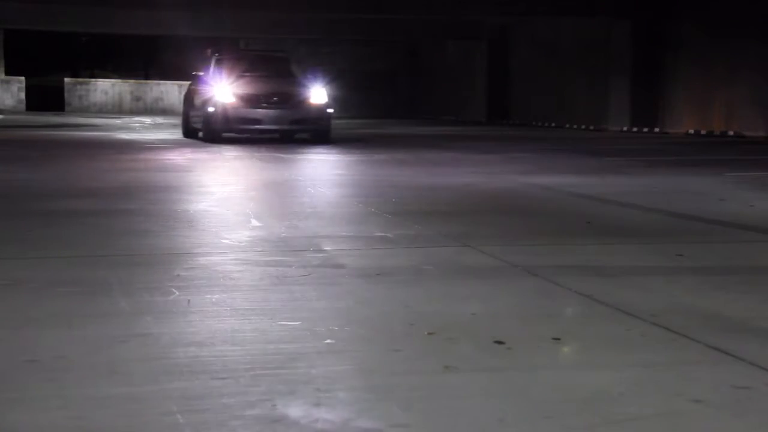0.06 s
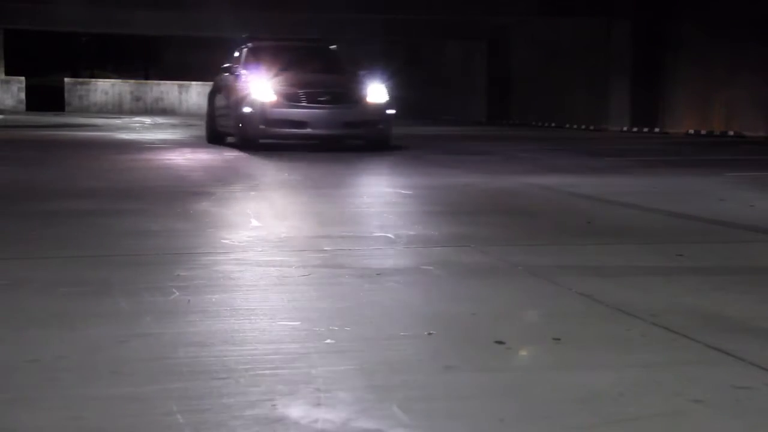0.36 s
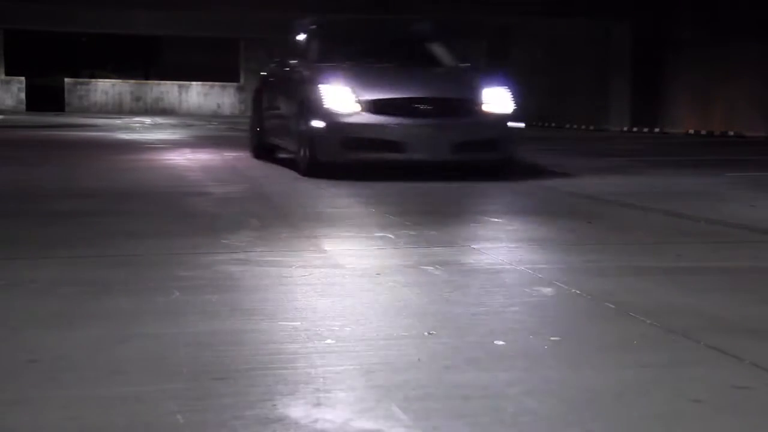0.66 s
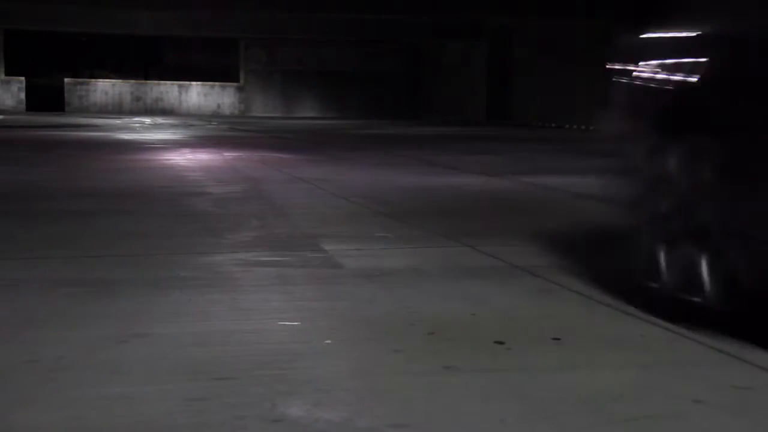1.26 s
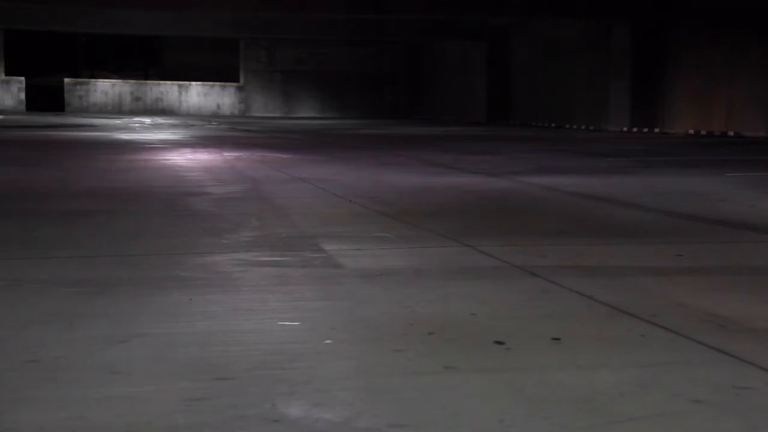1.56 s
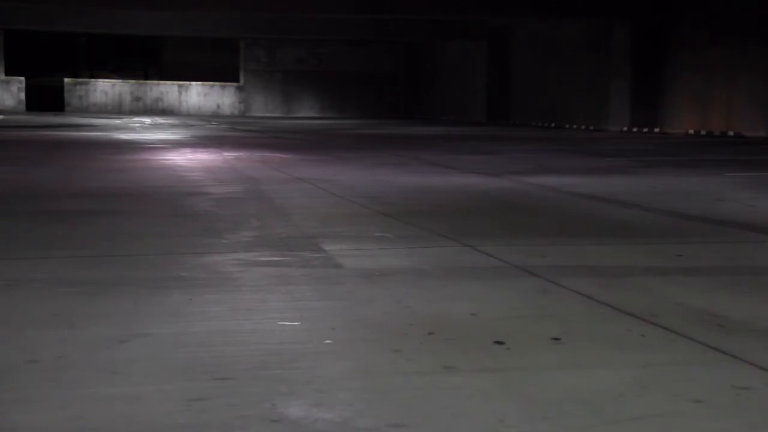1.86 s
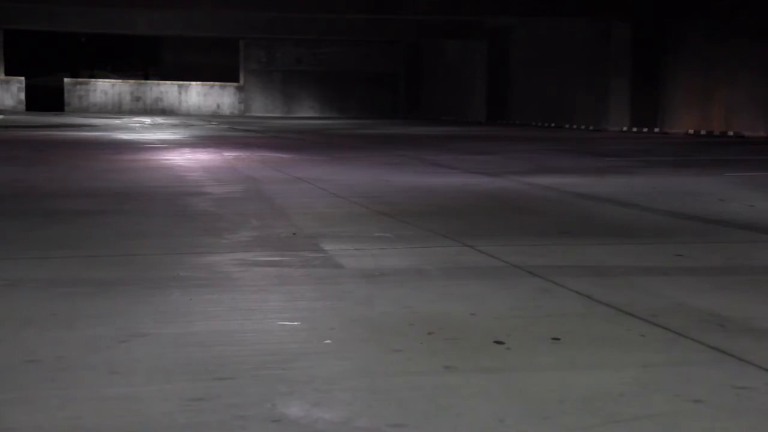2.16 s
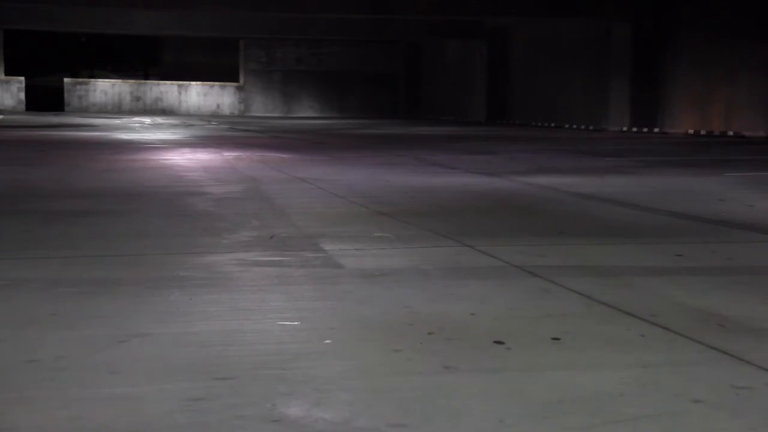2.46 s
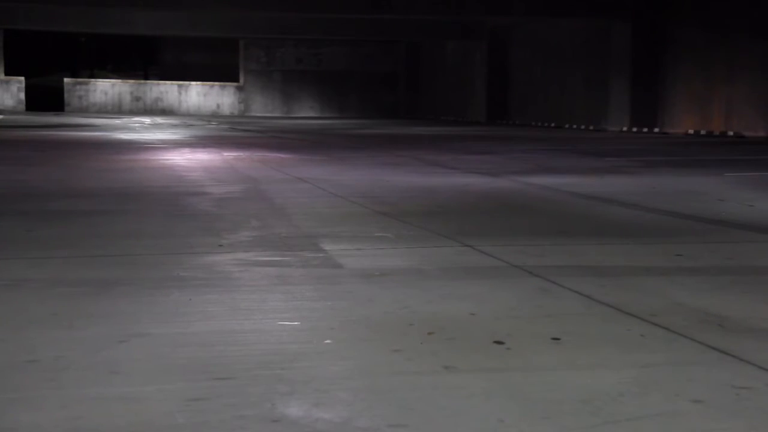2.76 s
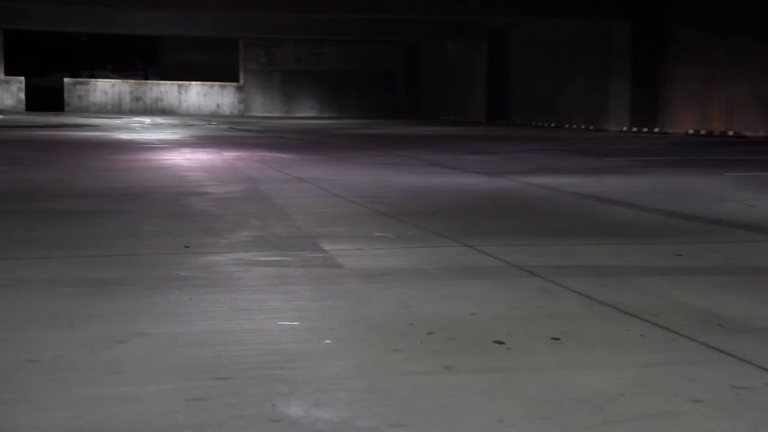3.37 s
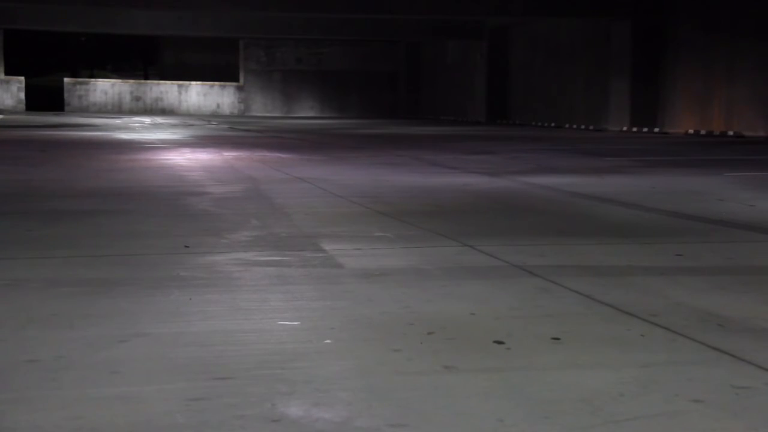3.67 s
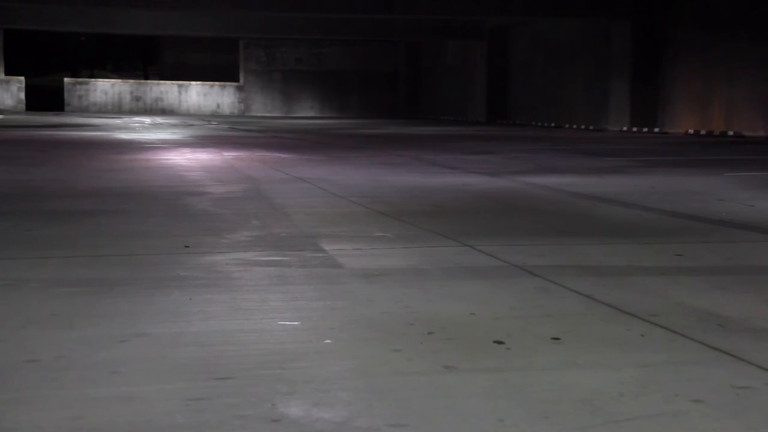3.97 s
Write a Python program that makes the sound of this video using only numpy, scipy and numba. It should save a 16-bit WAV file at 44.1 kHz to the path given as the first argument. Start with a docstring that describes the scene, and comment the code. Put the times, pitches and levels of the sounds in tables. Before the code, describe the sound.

In a reverberant parking garage, a car's engine note climbs as it approaches. Tyres and exhaust rush past close to the microphone, then the pitch drops and the engine burbles and booms while the car rolls away.

```python
"""A six-cylinder exhaust note climbs as a car accelerates through a ringing concrete garage.
The car passes close to a camera and eases off: the note drops and gives way to burble and low boom.
Uneven firings ring the exhaust and body and gate a gas rasp; tyres and the tailpipe jet hiss past.
Standing waves throb and the hall hisses throughout; the camera's gain control evens the level."""
import sys
import numpy as np
from scipy import signal
from scipy.fft import rfft, irfft
from scipy.io import wavfile
from scipy.ndimage import uniform_filter1d, map_coordinates
from numba import njit

SR = 44100
rng = np.random.default_rng(int(sys.argv[2]) if len(sys.argv) > 2 else 0)


def materialize(psi):
    """Save the field psi as 16-bit PCM at rate SR to the path in sys.argv[1].

    A 1-D psi becomes a single channel; in a 2-D psi each row is a channel.
    """
    bounded = np.clip(np.atleast_2d(psi).T, -1, 1)
    quanta = np.round(bounded * 32767).astype(np.int16)
    wavfile.write(sys.argv[1], SR, quanta)


N = 176400
LEAD_S = 1.5  # fills the hall before time zero
T = np.arange(-int(LEAD_S * SR), N) / SR

# Engine firing rate: time_s, rate_hz
FIRING_RATE = [(-1.5, 168), (-0.25, 168), (-0.06, 184), (0.0059, 204), (0.3852, 224), (0.84, 278),
               (1.06, 292), (1.23, 308), (1.36, 305), (1.41, 254), (1.46, 236), (1.55, 220), (1.85, 221),
               (2.08, 192), (2.5, 178), (3, 171), (3, 141), (3.5, 138.5)]
# Engine layer gains: time_s, note_direct_db, note_hall_db, burble_db, rasp_db
ENGINE_GAINS = [(0, -19.5, -12.5, -22, -20.5), (.3, -19.5, -16, -22, -23), (.6, -28, -20, -28, -22),
                (.95, -23, -16.5, -28, -20.5), (1.1, -19.5, -15.5, -28.5, -24),
                (1.21, -12.5, -14.5, -25, -22), (1.37, -13.5, -18, -29, -17.5),
                (1.45, -17.5, -23, -25, -18), (1.54, -19.5, -25.5, -38, -19),
                (1.72, -27.5, -25.5, -24, -21), (1.95, -20, -20.5, -24, -22.5),
                (2.2, -23.5, -23, -23.5, -23), (2.5, -20, -23, -21, -27.5), (2.9, -24, -20, -20, -29.5),
                (3.3, -32, -29.5, -16, -24.5), (3.7, -32, -32, -20.5, -29), (4, -40, -37, -12, -25.5)]
# Exhaust note partials: firing_rate_multiple, level_db
NOTE_ORDERS = [(1, 0.5), (1.5, -32.5), (2, -3.5), (2.5, -24.5), (3, -9), (3.5, -22), (4, -12.5), (5, -20),
               (6, -22)]
# Overtone bite, strongest as the tailpipe faces the camera: time_s, gain_db
OVERTONE_BITE = [(0, -0.5), (.4, -0.5), (.9, 2.5), (1.25, -4.5), (1.42, 1), (1.52, 9.5), (1.61, 3),
                 (1.8, -1.5), (2.0, -8), (4, -0.5)]
# Tailpipe response: freq_hz, gain_db
TAILPIPE_RESPONSE = [(130, -5), (175, 1.5), (215, 1.5), (245, -1), (275, -5), (312, 2.5), (352, -7),
                     (400, 4.5), (448, 3), (510, -9), (580, 4.5), (625, -0.5), (720, -2.5), (860, 0),
                     (1200, 1.5), (2000, 5)]
# Firing strength per cylinder: level_db
CYLINDER_LEVELS = [-2, -10.5, -4, -10.5, -0.5, -6]
# Exhaust and body resonances: freq_hz, width_hz, gain_db
BODY_MODES = [(166.1, 22.4, 1), (212.5, 24.3, 1.5), (274.7, 32, 0.5), (314.3, 28, 1.5), (365.6, 56, -1),
              (419.4, 27, -5), (491, 9.1, -7.5), (565, 34, -0.5), (627, 26, -3.5), (852, 44, -15.5),
              (928, 42, -15.5), (1200, 74, -18.5)]
# Gas rasp spectrum: freq_hz, density_db
RASP_SPECTRUM = [(30, -39), (100, -10), (170, -12), (400, 3), (700, 2), (1150, -1.5), (1600, -9),
                 (3000, -21.5), (6000, -38), (15000, -66)]
# Standing waves between floor, ceiling and walls: freq_hz, width_hz
ROOM_MODES = [(171, 18), (208, 10.2), (305, 21)]
# Their strength as the car moves: time_s, first_db, second_db, third_db
ROOM_MODE_LEVELS = [(0, -20, -24, -49.5), (.5, -29, -33.5, -48), (1.7, -46, -35, -34.5),
                    (2.05, -32, -34, -28), (2.3, -20.5, -38, -20.5), (2.55, -19, -28, -30),
                    (2.85, -22.5, -24, -37), (3.3, -25, -25.5, -31), (3.65, -19, -31, -46),
                    (4, -22, -39, -32)]
# Hall hiss spectrum: freq_hz, density_db
HISS_SPECTRUM = [(25, -13), (100, -4.5), (1000, 5), (3000, -6.5), (5500, -17), (7500, -20), (11000, -30.5),
                 (16000, -44)]
# Hall hiss envelope: time_s, level_db
HISS_LEVELS = [(0, -34), (1.5, -40.5), (2.6, -41.5), (3.1, -37.5), (3.5, -34.5), (3.7, -35.5), (4, -32)]
# Tyre noise spectrum: freq_hz, density_db
TYRE_SPECTRUM = [(30, -32), (100, -14), (400, -3.5), (1000, 6), (2000, 0), (3200, -4.5), (5000, -14),
                 (8000, -20), (12000, -25), (16000, -35)]
# Axle passes: time_s, level_db
AXLE_PASSES = [(1.03, -26.5), (1.379, -24.5)]
# Tailpipe jet spectrum: freq_hz, density_db
JET_SPECTRUM = [(30, -15), (110, 3), (220, 0), (1000, 5), (3000, 2), (6000, -15.5), (12000, -28),
                (16000, -27)]
# Silencer boom spectrum: freq_hz, density_db
BOOM_SPECTRUM = [(25, -34), (52, -29), (66, -15), (77, -1), (88, -5.5), (115, -10), (150, -16), (400, -51),
                 (2000, -82)]
# Silencer boom envelope: time_s, level_db
BOOM_LEVELS = [(0, -54), (.8, -58), (1.3, -48), (1.7, -65), (2.3, -60), (2.5, -39), (3.05, -40.5),
               (3.22, -33), (3.6, -28.5), (3.75, -35.5), (4, -29)]
# Hall reverberation: freq_hz, t60_s
HALL_DECAY = [(80, 1.2), (300, 3.18), (1000, 2.7), (4000, 3), (14000, .45)]

SPEED_M_S, PASS_S, NEAREST_M = 12., 1.38, 2.466
ALONG_M = SPEED_M_S * (T - PASS_S)
RANGE_M = np.hypot(ALONG_M, NEAREST_M)


def undb(db):
    """Decibels to gain."""
    return 10 ** (np.asarray(db) / 20)


def unit(x):
    """Scale to rms 1."""
    return x / np.sqrt(np.mean(x ** 2))


def curve(table, column=1):
    """Table column, interpolated over time."""
    rows = np.array(table)
    return np.interp(T, rows[:, 0], rows[:, column])


def noise():
    """White noise, scene length."""
    return rng.standard_normal(len(T))


def drift(rate_hz):
    """Smooth random signal, spread near 1."""
    hold = int(SR / rate_hz)
    steps = np.repeat(rng.standard_normal(len(T) // hold + 1), hold)
    return 1.3 * uniform_filter1d(uniform_filter1d(steps, hold), hold)[:len(T)]


def bins_hz(x):
    """FFT frequencies, raised 1 Hz to avoid zero."""
    return np.fft.rfftfreq(len(x), 1 / SR) + 1


def colour(x, spectrum):
    """Filter by (freq_hz, gain_db) points; rms 1."""
    hz, db = np.array(spectrum).T
    gain = undb(np.interp(np.log(bins_hz(x)), np.log(hz), db))
    return unit(irfft(rfft(x) * gain, len(x)))


def resonance(centre_hz, width_hz):
    """Gain of one mode per FFT bin."""
    hz = bins_hz(T)
    return 1 / (1 + ((hz - centre_hz ** 2 / hz) / width_hz) ** 2)


def hall(x):
    """Dense reflections off concrete; treble dies first."""
    t = np.arange(2 * SR) / SR
    hz, t60_s = np.array(HALL_DECAY).T
    white = rfft(rng.standard_normal(len(t)))
    tail = 0
    for band, ring_s in zip(np.eye(len(hz)), t60_s):
        weight = np.interp(np.log(bins_hz(t)), np.log(hz), band)
        tail += irfft(white * weight) * unit(np.exp(-np.log(1000) * t / ring_s))
    return signal.fftconvolve(x, tail / np.sqrt(len(t)))[:len(x)]


def delayed(x, path_m):
    """Travel delay; a changing path gives Doppler shift."""
    return map_coordinates(x, [np.arange(len(x)) - path_m / 343 * SR], order=1, mode="mirror")


def moving_hall(x):
    """Hall fed from the walls ahead of and behind the car."""
    return (hall(delayed(x, -ALONG_M)) + hall(delayed(x, ALONG_M))) / np.sqrt(2)


def firing_cycles(wander=.005, jitter_cycles=.028):
    """Running firing count; the rate wanders, firings fall early or late."""
    rate_hz = curve(FIRING_RATE) * (1 + wander * drift(14))
    return np.cumsum(rate_hz) / SR + jitter_cycles * drift(70) + 1


def exhaust_note(cycles, flutter=0.31):
    """Fluttering engine orders, coloured by the tailpipe; direct plus hall."""
    bite = undb(curve(OVERTONE_BITE))
    partials = 0
    for order, db in NOTE_ORDERS:
        gain = undb(db) * (bite if order > 1 else 1) * (1 + flutter * drift(45))
        partials += gain * np.sin(2 * np.pi * order * cycles)
    note = colour(partials, TAILPIPE_RESPONSE)
    direct = delayed(note, RANGE_M) * undb(curve(ENGINE_GAINS, column=1))
    return direct + moving_hall(note * undb(curve(ENGINE_GAINS, column=2)))


def firings(cycles, scatter_db=4., decay_cycles=0.51):
    """Cylinders fire in turn, unevenly: an impulse and a decaying puff each."""
    index = cycles.astype(int)
    cylinder_db = np.array(CYLINDER_LEVELS)[index % len(CYLINDER_LEVELS)]
    strength = undb(cylinder_db + scatter_db * rng.uniform(-0.84, 1, size=4096)[index])
    pulses = strength * np.diff(index, prepend=0)
    puffs = strength * np.exp(-(cycles % 1) / decay_cycles)
    return pulses, puffs


def burble(pulses, direct_db=-9.5):
    """Uneven firings ring the exhaust and body."""
    drive = pulses * undb(curve(ENGINE_GAINS, column=3))
    direct = delayed(drive, RANGE_M) * NEAREST_M / RANGE_M
    arriving = moving_hall(drive) + undb(direct_db) * direct
    body = np.sqrt(sum((undb(db) * resonance(hz, width_hz)) ** 2 for hz, width_hz, db in BODY_MODES))
    ring = lambda x: irfft(rfft(x) * body, len(T))
    return ring(arriving) / np.std(ring(pulses))


def gas_rasp(puffs):
    """Rushing gas, gated by the firings."""
    gas = colour(noise() * puffs, RASP_SPECTRUM) * undb(curve(ENGINE_GAINS, column=4))
    return undb(-2) * hall(gas) + undb(-5) * gas


def standing_waves():
    """Low garage modes swell and throb as the car drives through."""
    total = 0
    for column, (hz, width_hz) in enumerate(ROOM_MODES, start=1):
        mode = unit(irfft(rfft(noise()) * resonance(hz, width_hz), len(T)))
        total += mode * undb(curve(ROOM_MODE_LEVELS, column))
    return total


def hall_hiss():
    """Diffuse hiss of distant rolling and air."""
    return colour(noise(), HISS_SPECTRUM) * undb(curve(HISS_LEVELS) + drift(20))


def tyres(nearest_m=2.54, hall_db=-9):
    """Rubber on smooth concrete, swelling as each axle nears."""
    power = sum(undb(db) ** 2 / (1 + (SPEED_M_S * (T - pass_s) / nearest_m) ** 2)
                for pass_s, db in AXLE_PASSES)
    roll = colour(noise(), TYRE_SPECTRUM) * np.sqrt(power) * undb(.5 * drift(25.05))
    return roll * camera_shadow() + undb(hall_db) * hall(roll)


def tailpipe_jet(centre_s=1.44, width_s=0.17, gain_db=-27):
    """Brief rush of gas as the tailpipe passes."""
    swell = np.exp(-.5 * ((T - centre_s) / width_s) ** 2)
    return colour(noise(), JET_SPECTRUM) * undb(gain_db) * swell * camera_shadow()


def camera_shadow(behind_s=1.514, fade_s=0.045, shade_db=-9):
    """The camera body shades direct hiss once the car is behind it."""
    return undb(shade_db * (.5 + .5 * np.tanh((T - behind_s) / fade_s)))


def silencer_boom(puffs):
    """The silencer rumbles once the throttle closes."""
    return colour(noise() * puffs, BOOM_SPECTRUM) * undb(curve(BOOM_LEVELS))


def scene(turbulence_db=3):
    """Car and garage, mono, lead-in dropped."""
    cycles = firing_cycles()
    pulses, puffs = firings(cycles)
    ragged_pulses = unit(pulses) + undb(turbulence_db) * unit(noise() * puffs)
    engine = exhaust_note(cycles) + burble(ragged_pulses) + silencer_boom(puffs)
    gas = gas_rasp(puffs) + tailpipe_jet()
    return (engine + gas + tyres() + standing_waves() + hall_hiss())[None, -N:]


@njit
def follow(x, level, attack_s, release_s):
    """One-pole envelope follower."""
    envelope = np.empty(len(x))
    for i in range(len(x)):
        lag_s = attack_s if x[i] > level else release_s
        level += (x[i] - level) / (lag_s * SR)
        envelope[i] = level
    return envelope


def record(dry, threshold_db=-14, ratio=1.9, makeup_db=1.61, ceiling=0.89, cutoff_hz=15700):
    """Camera gain control, microphone peak rounding, low-pass."""
    rectified = np.abs(dry[0])
    envelope = follow(rectified, 2 * np.mean(rectified), attack_s=0.021, release_s=0.2)
    gain = np.minimum(1, undb(threshold_db) / envelope) ** (1 - 1 / ratio)
    levelled = dry * gain * undb(makeup_db)
    rounded = levelled / (1 + (levelled / ceiling) ** 4) ** (1 / 4)
    return signal.sosfilt(signal.ellip(10, .2, 80, cutoff_hz, fs=SR, output="sos"), rounded)


dry = scene()
out = record(dry)
materialize(out)
```